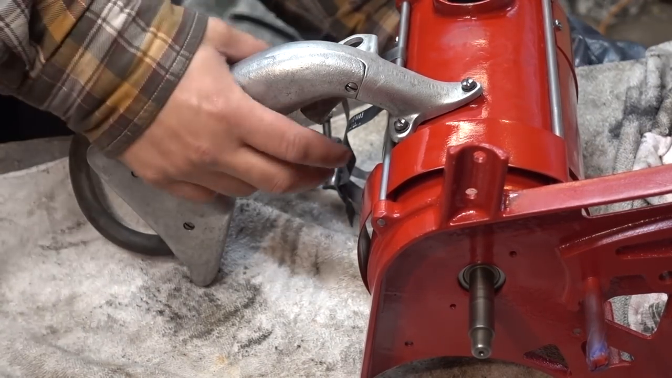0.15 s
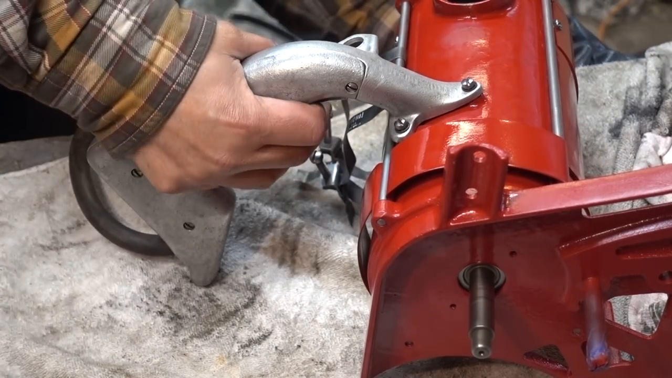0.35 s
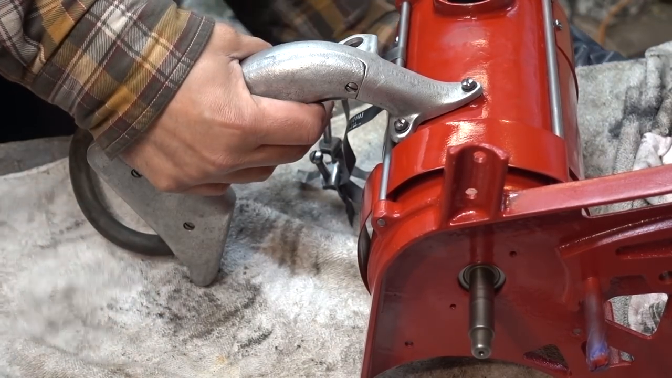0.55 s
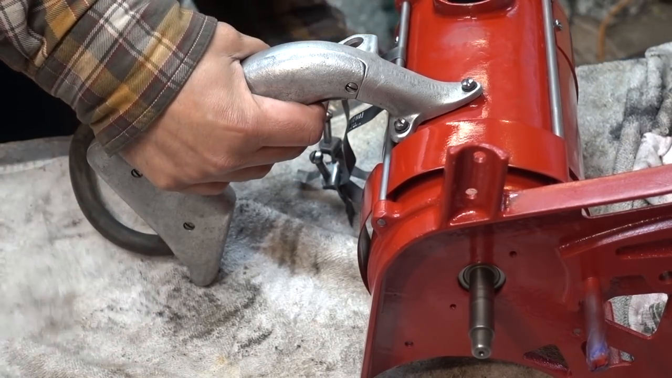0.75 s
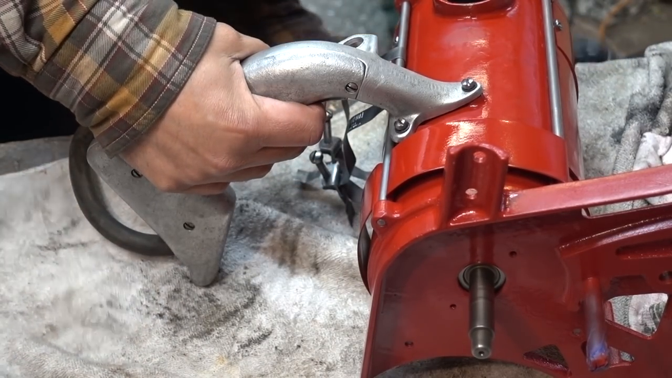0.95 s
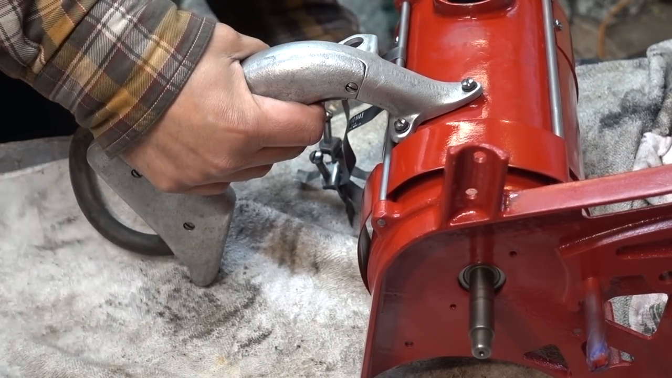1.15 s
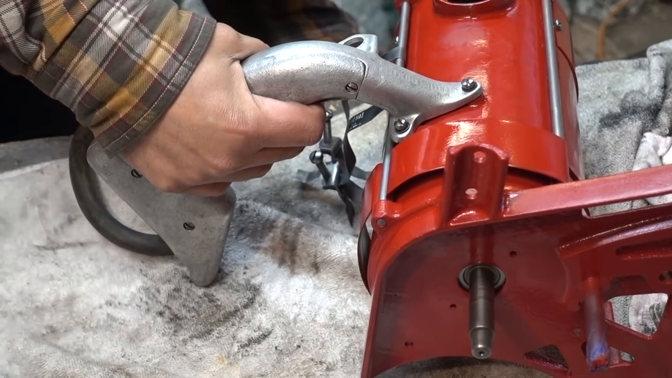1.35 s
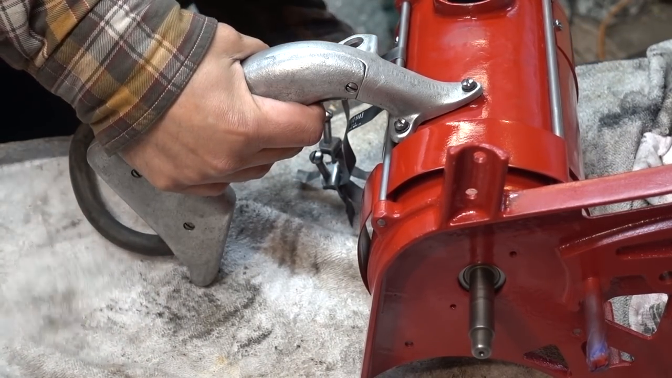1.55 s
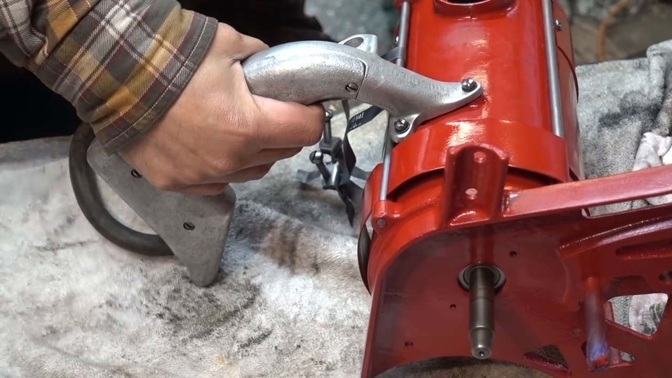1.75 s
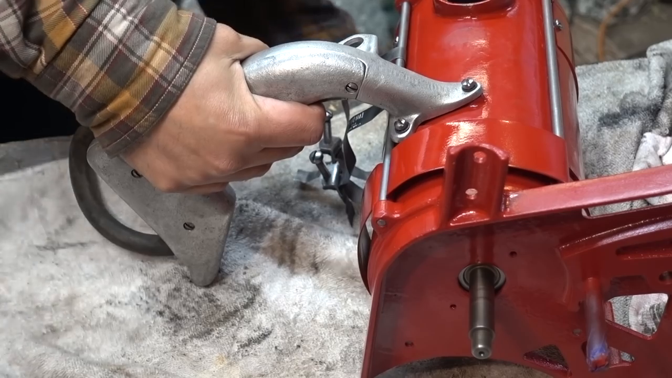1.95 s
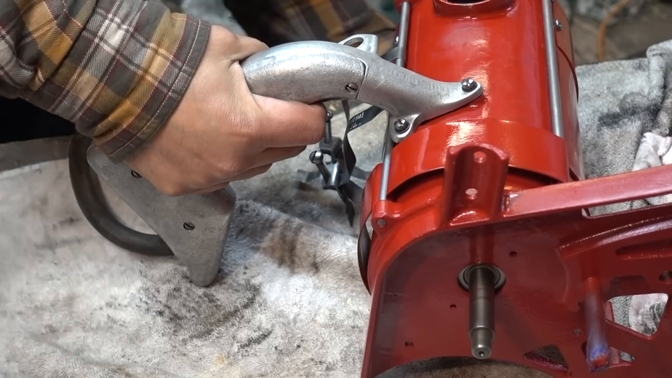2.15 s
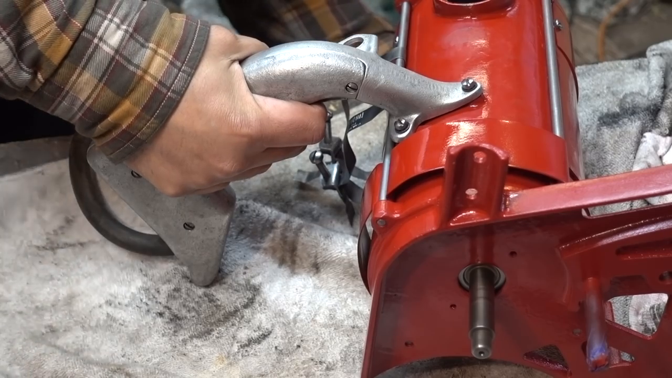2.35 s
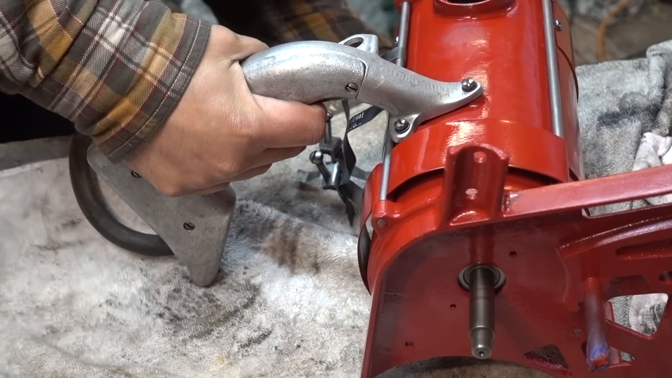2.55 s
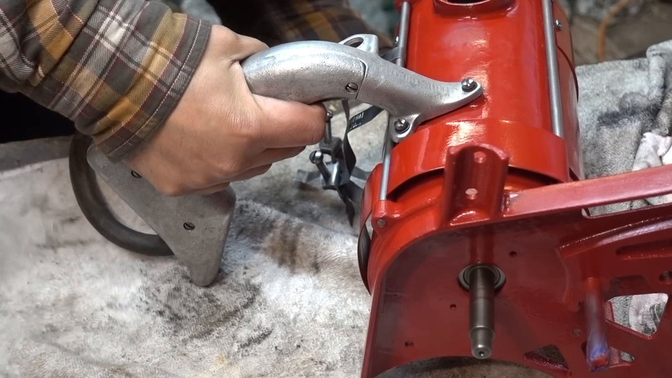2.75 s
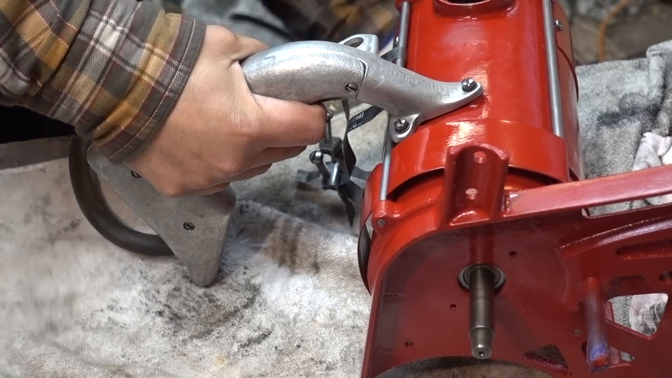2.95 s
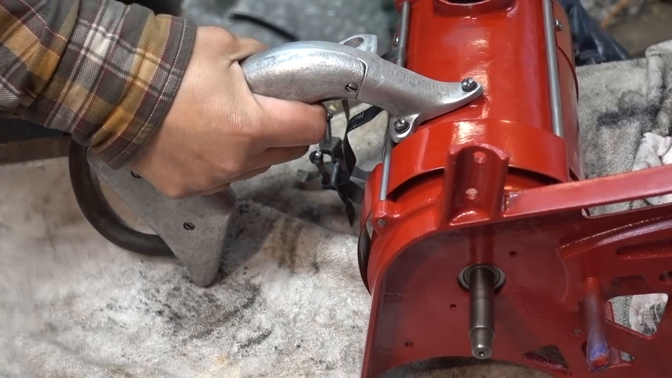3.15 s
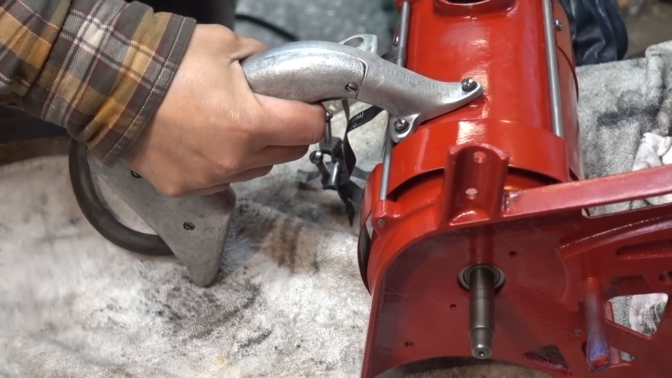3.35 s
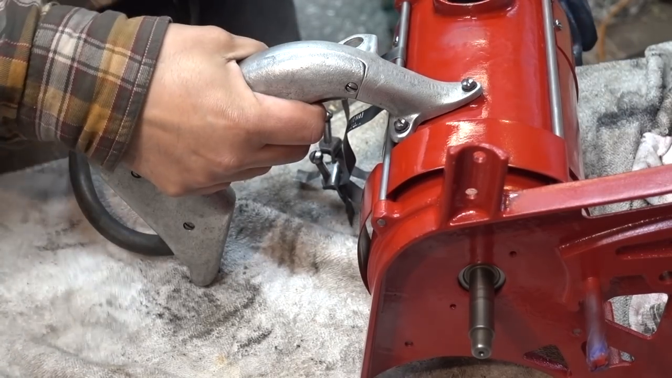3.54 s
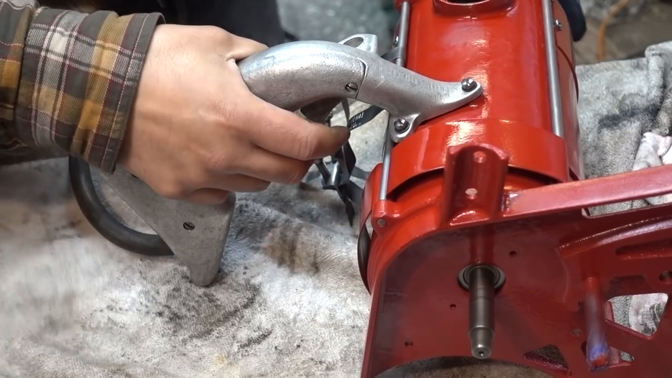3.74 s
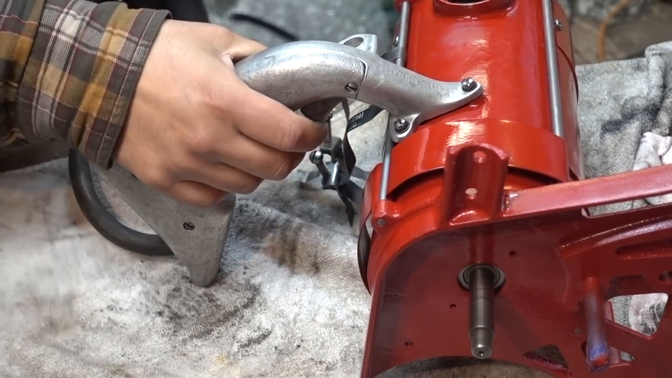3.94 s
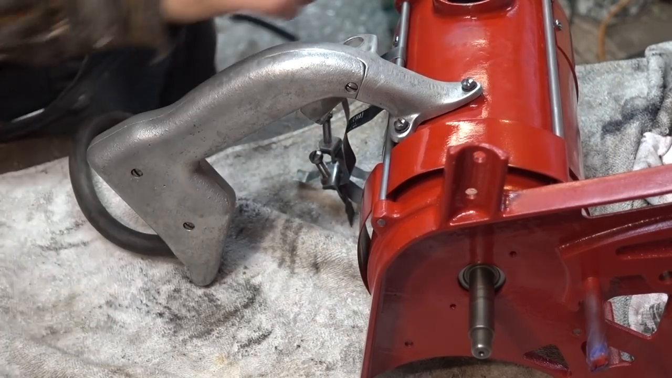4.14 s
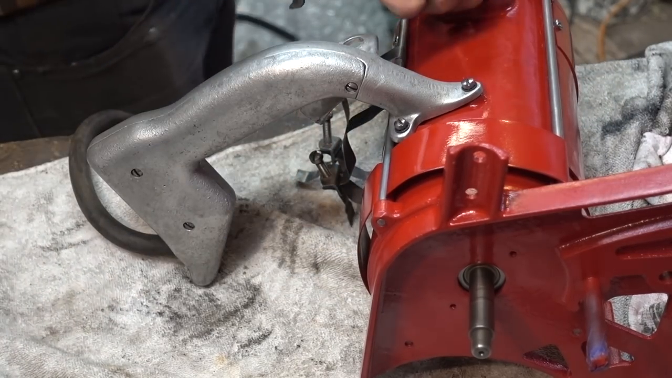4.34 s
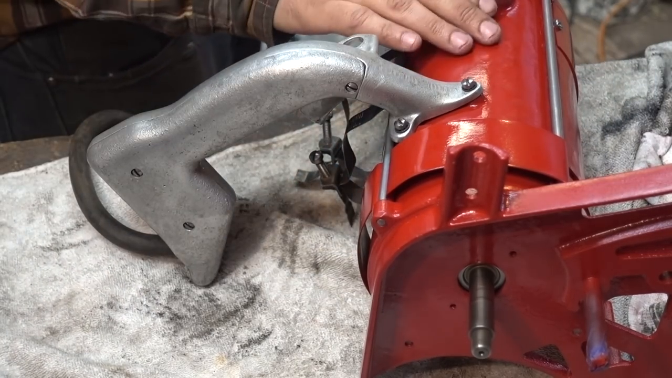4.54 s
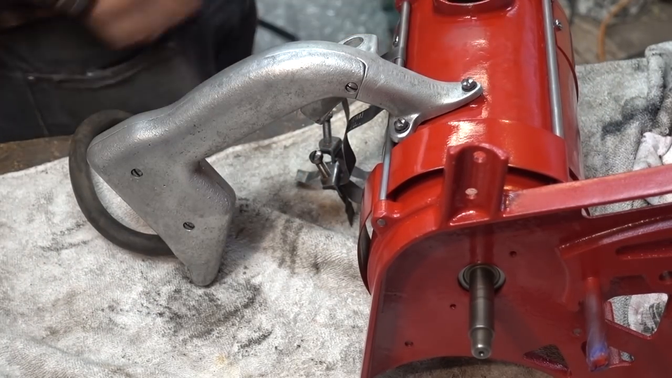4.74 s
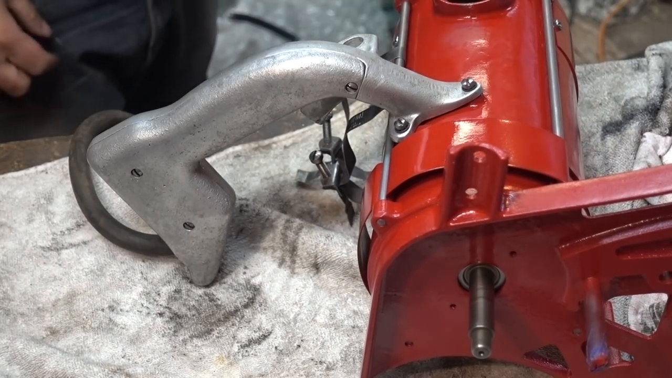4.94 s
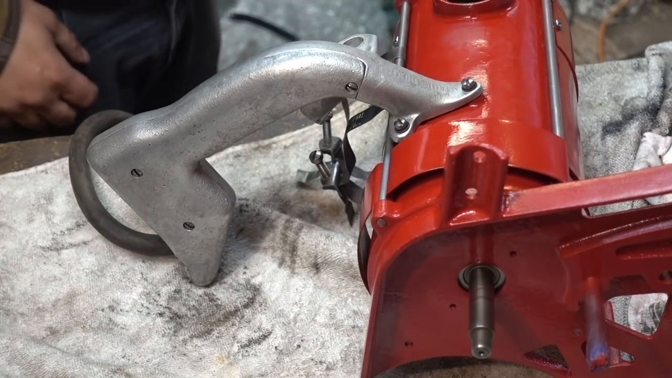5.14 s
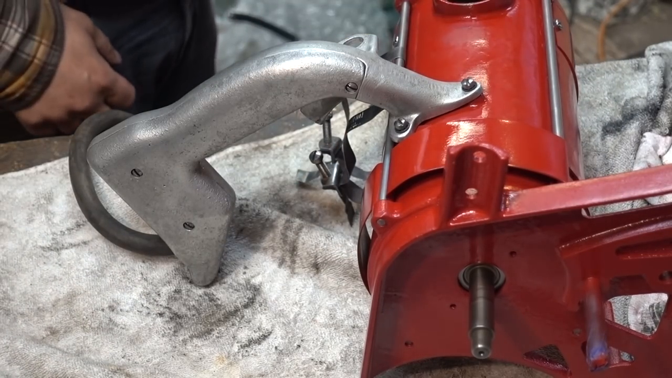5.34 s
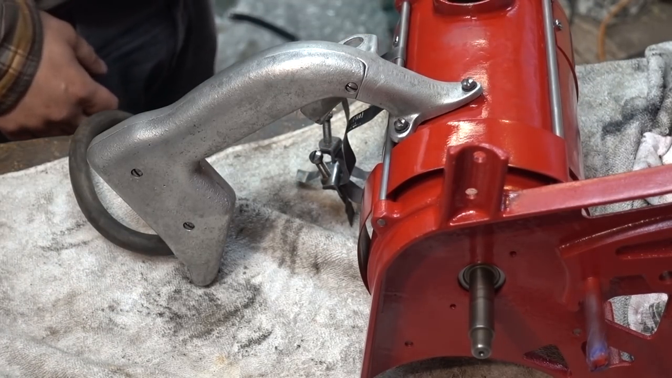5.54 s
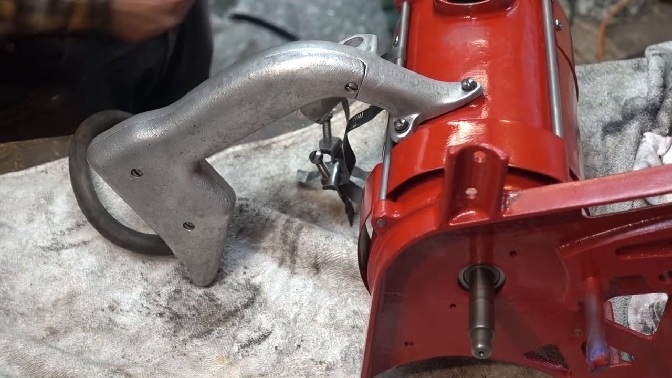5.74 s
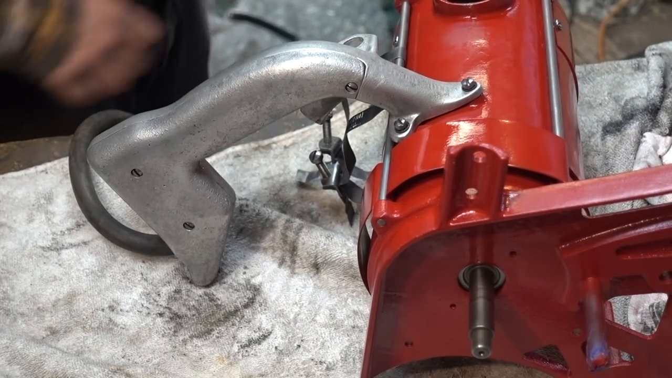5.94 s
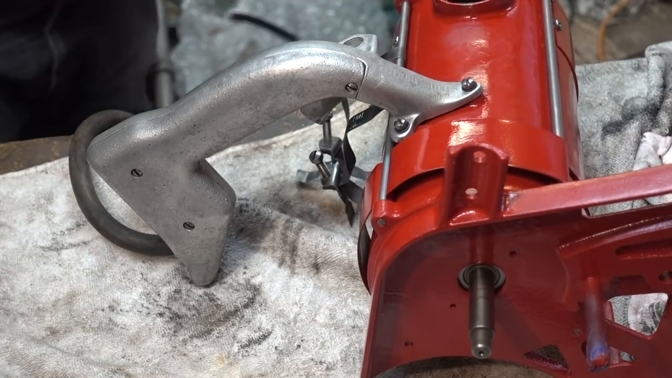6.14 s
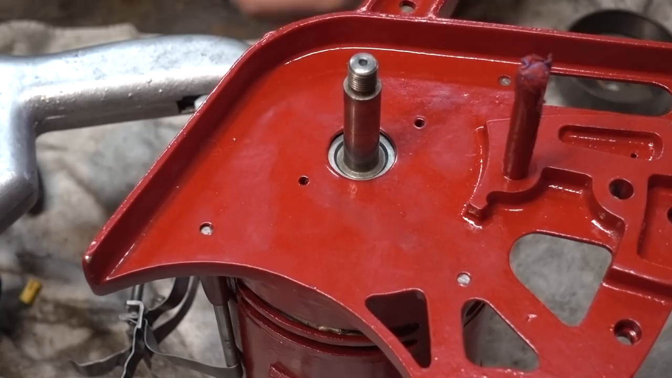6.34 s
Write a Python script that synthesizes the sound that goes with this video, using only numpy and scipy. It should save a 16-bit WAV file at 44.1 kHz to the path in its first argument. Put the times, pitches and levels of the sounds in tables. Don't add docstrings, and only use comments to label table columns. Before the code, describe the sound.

An electric motor without load, heard near on a bench. A descending whine turns quickly upward, wobbling through resonances, and settles into a bright whistle around two kilohertz with broad airy hiss. After about three seconds it runs down, the tone sliding lower and breaking into beads, airflow fading to grainy rubbing. A sudden change to near silence and a small steel part clinks. Thin bass, little room echo.

```python
import sys
import numpy as np
from scipy import signal
from scipy.io import wavfile
from scipy.ndimage import uniform_filter1d

SR = 44100
rng = np.random.default_rng(int(sys.argv[2]) if len(sys.argv) > 2 else 0)


def convert_level_to_amplitude(level_db):
    exponent = np.asarray(level_db, float) / 20
    return 10 ** exponent


def bounce(signal):
    frames = np.transpose(np.atleast_2d(signal))
    limited = np.clip(frames, -1, 1)
    pcm = np.round(limited * 32767).astype(np.int16)
    wavfile.write(sys.argv[1], SR, pcm)


N = 286209

ON_S, OFF_S = .415, 3.705
FULL_RPS = 208


def rms_one(x):
    return x / np.sqrt(np.mean(x ** 2) + 1e-20)


def in_time(rows):
    s, *columns = np.transpose(rows)
    return [np.interp(np.arange(N) / SR, s, c) for c in columns]


def at_hz(points, hz):
    points_hz, values = np.array(points).T
    return np.interp(np.log(hz), np.log(points_hz), values)


def by_speed(speed, column):
    # [speed/(turns/s), rub/dB, scars/dB, bench shake/dB, upper orders/dB]
    rows = np.array([(23.5, -67.5, -60, -83, -78), (33.2, -59.5, -62.5, -72.5, -73),
                     (66, -72, -60, -63, -88), (90, -90, -84, -63, -84), (137, -72.5, -70, -59.5, -69),
                     (174, -73.5, -63, -65, -80), (208, -57, -69.5, -82.5, -87)])
    return np.interp(np.log(speed), np.log(rows[:, 0]), rows[:, column])


def drift(rate_hz):
    r = np.exp(-80 * np.pi * rate_hz / SR)
    slow = signal.lfilter([1], [1, -2 * r, r * r], rng.standard_normal(N // 40 + 2002))[2000:]
    return np.interp(np.arange(N) / 40, np.arange(len(slow)), rms_one(slow))


def resonate(x, hz, width_hz):
    r = np.exp(-np.pi * width_hz / SR)
    zeros = np.array([1, 0, -1]) * (1 - r * r) / 2
    poles = [1, -2 * r * np.cos(2 * np.pi * hz / SR), r * r]
    return signal.lfilter(zeros, poles, x)


def banded(white, spectrum, change_db, patchy_db):
    likeness = [(60, 0.77), (150, 1), (380, 1), (950, 0.99), (2380, 0.82), (5980, 0.37), (15000, 0.43)]
    lean_db = [(100, -1.5), (1000, -0.3), (4000, -0.4), (12000, -0.5)]
    sign = np.array([[1], [-1]])
    edges_hz = 60 * 2 ** np.arange(0, 8.2, .4)
    out, together = 0, drift(9)
    for k, (low, high) in enumerate(zip(edges_hz, edges_hz[1:])):
        band = signal.butter(2, [low, high], "band", fs=SR, output="sos")
        mid, side = signal.sosfilt(band, white[k % 2])
        hz = np.sqrt(low * high)
        alike = np.clip(at_hz(likeness, hz), 0, 1)
        flicker_db = patchy_db * (0.24 * together + 0.45 * drift(38))
        gain = convert_level_to_amplitude(at_hz(spectrum, hz) + change_db(hz) + flicker_db)
        tilt = convert_level_to_amplitude(at_hz(lean_db, hz) / 2 * sign)
        out = out + gain * tilt * (np.sqrt(1 + alike) * mid + np.sqrt(1 - alike) * side * sign)
    return out


def room_ripple(hz, gliding, depth, grain_hz):
    land = rng.standard_normal((3, 1200)) + 1j * rng.standard_normal((3, 1200))
    at = [np.interp(hz[::16] / grain_hz, np.arange(1200), row) for row in land]
    echo = depth * gliding[::16]
    mixed = 1.17 * at[0] + 0.52 * np.array(at[1:])
    gain = np.abs(1 + echo * mixed) / np.sqrt(1 + echo ** 2)
    return gain.repeat(16, axis=1)[:, :N]


def shaft_speed():
    run_up = [(30.2, .151), (43.94, .3921)]
    start_rps, rest_rps, coast_s = 174.1, 63.15, .8747
    creep_rps_per_s = .6786
    friction_rps_per_s, drag_rps, drag_s = 27.28, 127.73, 1.248
    stick_s, stick_rps_per_s2 = 5.6, 3.2
    t = np.arange(N) / SR
    on = np.clip(t - ON_S, 0, OFF_S - ON_S)
    off = np.maximum(t - OFF_S, 0)
    first = rest_rps + (start_rps - rest_rps) * np.exp(-np.minimum(t, ON_S) / coast_s)
    gained = creep_rps_per_s * on + sum(rps * (1 - np.exp(-on / lag_s)) for rps, lag_s in run_up)
    friction = friction_rps_per_s * off + stick_rps_per_s2 * np.maximum(t - stick_s, 0) ** 2
    drag = drag_rps * (1 - np.exp(-off / drag_s))
    return first + gained - friction - drag


def fan_tone(turn, speed, gliding):
    # [t/s, left/dB, right/dB]
    blade = [(0, -45, -40.5), (.3, -49.5, -43.5), (.6, -41.5, -53), (.9, -44.5, -37.5), (1.05, -26, -29),
             (1.3, -25.5, -30.5), (1.62, -23.5, -34), (2.0, -28, -41.5), (2.57, -27.5, -37),
             (3.0, -30, -37), (3.3, -32.5, -35.5), (3.69, -35, -38), (3.73, -44.5, -40.5), (4.0, -40, -45),
             (4.8, -54.5, -56), (5.15, -60, -66), (5.62, -65, -66), (6.35, -100, -100)]
    # [t/s, left/dB, right/dB, width/ms]
    blade_swells = [(.002, -23.5, -32, 19), (.05, -30, -28.5, 5.1), (.162, -29, -31, 9.3),
                    (.181, -24, -20, 11), (.199, -26, -25, 9), (0.218, -23.5, -20, 11.6),
                    (0.254, -21, -25, 22), (.285, -26, -45, 6.8), (.309, -28, -35, 17),
                    (.459, -26.5, -34, 13), (.493, -22, -23.5, 19.6), (0.519, -25, -29.5, 11),
                    (.56, -44, -28.5, 37), (0.63, -32.5, -34, 21), (.653, -27, -34, 7.6),
                    (0.714, -24, -30, 27.4), (.922, -33, -47, 23), (3.993, -37, -47, 17),
                    (4.073, -34, -22.5, 6.1), (4.088, -38, -22, 12.5), (4.109, -41, -26.5, 13),
                    (4.2, -35, -34.5, 25), (4.245, -32.5, -28.5, 25), (4.276, -23.5, -24.5, 21.7),
                    (4.45, -39, -36.5, 24), (4.548, -34, -35.5, 28), (4.733, -43.5, -51, 28),
                    (4.893, -42, -41.5, 41), (5.285, -50, -53.5, 52), (5.48, -54.5, -51.5, 143)]
    # [shaft order, left/dB, right/dB at full speed, loss/dB per halving of speed]
    overtones = [(20, -59.5, -57.5, 12.5), (30, -62, -62.5, 17)]
    # [t/s, shaft order, left/dB, right/dB, width/ms]
    overtone_swells = [(.03, 30, -60, -50, 40), (.082, 20, -47, -51.5, 19), (4.27, 20, -60, -55.5, 51),
                       (.575, 20, -56, -50, 45), (.639, 20, -59, -35.5, 14), (.79, 30, -43.5, -42, 33),
                       (.83, 20, -52, -41.5, 74), (.92, 30, -50, -40.5, 58), (1.02, 30, -47, -57, 19),
                       (1.24, 30, -56.5, -52, 130), (1.42, 20, -42, -65, 44), (1.43, 30, -51.5, -52, 48),
                       (1.9, 30, -57.5, -58, 180), (2.0, 20, -53, -61, 140), (2.36, 20, -51, -44, 330),
                       (3.33, 20, -54, -49.5, 160), (3.6, 20, -56, -50.5, 260), (3.5, 30, -63, -59, 450),
                       (3.825, 30, -46.5, -44.5, 23), (3.873, 20, -50, -40, 23),
                       (3.883, 30, -40, -40.5, 11), (3.996, 20, -51, -41, 35), (4.085, 20, -43, -48, 28),
                       (4.55, 20, -57.5, -61, 100)]
    port_lags = [(10, 0.24), (20, 0.65), (30, 1)]
    glide_loss_db = 1

    t, out = np.arange(N) / SR, 0
    levels = [np.array(in_time(blade))]
    for _, left_db, right_db, loss_db in overtones:
        change_db = loss_db * np.log2(speed / FULL_RPS) - glide_loss_db * gliding
        levels.append(np.array([[left_db], [right_db]]) + change_db)
    swells = [(s, 10, left, right, ms) for s, left, right, ms in blade_swells] + list(overtone_swells)
    for (order, lag_rad), level_db in zip(port_lags, levels):
        ripple = room_ripple(order * speed, gliding, depth=3.6, grain_hz=13 * order / 10)
        power = (convert_level_to_amplitude(level_db + 0.67 * drift(32)) * ripple) ** 2
        for s, k, left_db, right_db, width_ms in swells:
            if round(k) == round(order):
                near = slice(max(0, int((s - width_ms / 500) * SR)), int((s + width_ms / 500) * SR))
                bump = np.exp(-((t[near] - s) / (width_ms * 0.00057)) ** 2)
                power[:, near] += convert_level_to_amplitude([[left_db], [right_db]]) ** 2 * bump
        out = out + np.sqrt(2 * power) * np.sin(order * turn - np.array([[0], [lag_rad]]))
    return out


def rotor_tones(turn, speed, gliding):
    slot_tone = [(380, -65), (430, -86), (760, -80), (880, -62), (1020, -70), (1250, -56), (1370, -49),
                 (1480, -68)]
    bar_tone = [(1100, -86), (1300, -65), (1580, -58), (1730, -61), (1840, -77), (2650, -75), (2850, -64),
                (3100, -76)]
    unbalance_tone = [(90, -98), (135, -80.5), (165, -68.5), (185, -82.5), (200, -71.5), (208, -70)]
    # [shaft order, level/dB at full speed, loss/dB per halving of speed]
    weak_orders = [(40, -71, 12.0)]
    surge_db, surge_s = 16, 0.09
    third_slot_db = 9

    upper_db = by_speed(speed, column=4)

    def muffled(k):
        octaves_off = np.abs(np.log2(k * speed / 3500))
        return upper_db - 14 * np.maximum(0, octaves_off - .5)

    levels = [(k, muffled(k)) for k in (36, 39, 45, 54, 64, 80)]
    levels.append((48, muffled(48) + third_slot_db))
    levels += [(k, db + loss * np.log2(speed / FULL_RPS)) for k, db, loss in weak_orders]
    tones = 0
    for k, db in levels:
        ripple = room_ripple(k * speed, gliding, depth=2.5, grain_hz=90)[0]
        tones = tones + convert_level_to_amplitude(db) * ripple * np.sin(k * turn + k)

    since_surge_s = np.arange(N) / SR - ON_S - surge_s / 2
    slot_db = at_hz(slot_tone, 16 * speed) + surge_db * np.exp(-(since_surge_s / surge_s) ** 2)
    bar_db = at_hz(bar_tone, 32 * speed)
    for k, db in (16, slot_db), (32, bar_db):
        ripple = room_ripple(k * speed, gliding, depth=.35, grain_hz=45)[0]
        tones = tones + convert_level_to_amplitude(db) * ripple * np.sin(k * turn + k)
    unbalance = convert_level_to_amplitude(at_hz(unbalance_tone, speed)) * np.sin(turn)
    return np.sqrt(2) * (tones + unbalance)


def airflow(turn, speed):
    air_colour = [(60, -40), (150, -47.5), (300, -29), (560, -27.5), (1100, -18.5), (1900, -20.5),
                  (2500, -26.5), (3100, -30), (4800, -27.5), (7000, -35), (10000, -46), (12500, -45.5),
                  (15600, -70)]
    housing = [(568, 103, 8), (1077, 20, 3), (1017, 41, 4), (1294, 34, 5.5), (1735, 73, 5),
               (4790, 1600, -4), (10180, 490, 6.5), (2304, 220, 2.5)]
    gust = [(0, 4), (.09, 2.5), (.18, 1), (.45, 0.5), (.54, 3.5), (.63, 1.5), (.72, 2), (.81, 5.5),
            (.99, 5), (1.17, 1), (2.0, 1.5), (3.4, -1), (3.8, 1), (4.09, 2), (4.22, 0.5), (4.48, 0),
            (5.5, 0.5), (6.35, 0)]
    # [f/Hz, level/dB at full speed, gust share, halvings of speed before fading, loss/dB per further halving]
    air_law = [(524, -0.5, 0.94, 1.18, 11.5), (1730, 0.8, 0.9, 0.57, 12), (4800, 2.5, 1.08, 0.068, 5),
               (11000, -2, 1.2, 0.14, 1.5)]
    air_db = -43

    gust_db, = in_time(gust)
    halvings = np.log2(FULL_RPS / speed)
    log_bands = np.log(np.array(air_law)[:, 0])
    changes_db = np.array([db + share * gust_db - loss * np.maximum(0, halvings - knee)
                           for _, db, share, knee, loss in air_law])

    def change_db(hz):
        top = 1 + 2.0 * max(0, np.log2(hz / 9500))
        weights = np.array([np.interp(np.log(hz), log_bands, one) for one in np.eye(4)])
        return top * weights @ changes_db

    grain_db = 0.67 * rng.standard_normal(N // 64 + 1).repeat(64)[:N]
    white = rng.standard_normal((2, 2, N)) * convert_level_to_amplitude(0.69 * np.sin(turn) + grain_db)
    air = banded(white, air_colour, change_db, patchy_db=2.07)
    air = air + sum((convert_level_to_amplitude(db) - 1) * resonate(air, hz, width) for hz, width, db in housing)
    return convert_level_to_amplitude(air_db) * air / np.sqrt(np.mean(air[:, 2 * SR:3 * SR] ** 2))


def shaft_rub(speed):
    rub_modes = [(1450, 300, -3), (1800, 250, -4), (2150, 110, 2), (2600, 250, -4), (4030, 120, -7),
                 (5300, 1000, -11), (9850, 100, -11), (12300, 120, -24)]
    struck = rng.random((2, N)) < 2500 / SR
    size = convert_level_to_amplitude(1.7 * np.minimum(rng.exponential(1, (2, N)), 5))
    clicks = struck * size * rng.choice([-1, 1], (2, N))
    clicks = clicks[0] + 0.12 * clicks[1] * [[1], [-1]]
    rings = sum(convert_level_to_amplitude(db + 1.5 * drift(20)) * resonate(clicks, hz, width) for hz, width, db in rub_modes)
    return convert_level_to_amplitude(by_speed(speed, column=1)) * rms_one(rings)


def commutator(turn, speed):
    scar_modes = [(1590, 330, 3.5), (2125, 94, 7), (2444, 160, -1), (3270, 290, -7.5), (4010, 280, -2),
                  (5200, 1300, 1.5)]
    profile = rng.standard_normal(320) * convert_level_to_amplitude(4.4 * rng.standard_normal(320))
    bumps = np.interp(turn / (2 * np.pi) % 1 * 320, np.arange(320), profile, period=320)
    rings = 0
    for hz, width_hz, db in scar_modes:
        ring = resonate(resonate(bumps, hz, width_hz), hz, width_hz)
        rings = rings + convert_level_to_amplitude(db + 2.5 * drift(6)) * ring
    return convert_level_to_amplitude(by_speed(speed, column=2)) * rms_one(rings)


def bench(turn, speed):
    bench_modes = [(175, 25, -9), (280, 22, -1), (375, 25, 0)]   # [f/Hz, width/Hz, level/dB]
    orders = sum(convert_level_to_amplitude(3 * rng.normal()) * np.sin(k * turn + k * k) for k in range(2, 15))
    rings = sum(convert_level_to_amplitude(db) * resonate(resonate(orders, hz, width), hz, width) for hz, width, db in bench_modes)
    return convert_level_to_amplitude(by_speed(speed, column=3)) * rings


def clink():
    # [t/s, level/dB, die-away/ms]
    clinks = [
        (6.407, -64, 5.2),
        (6.417, -65, 7.7),
        (6.425, -49.5, 5.7),
        (6.440, -83, 4),
        (6.447, -79, 5.8),
        (6.462, -75, 6.7),
    ]
    clink_modes = [(11200, 350, -13), (14100, 470, -19), (15000, 370, -25), (2310, 490, -14.5),
                   (3060, 550, -19.5), (5900, 480, -23), (7870, 500, -27.5)]
    sing_hz = 11020
    n = SR // 4
    ms = np.arange(N - n, N) / SR * 1000
    white = rng.standard_normal(n)
    strokes = 0
    for s, db, die_ms in clinks:
        after_ms = ms - 1000 * s
        slope_ms = np.where(after_ms < 0, 0.42 * die_ms, die_ms)
        strokes = strokes + convert_level_to_amplitude(db) * np.exp(-(after_ms / slope_ms) ** 2)
    modes = np.sqrt(2 * strokes / strokes.max()) * np.sin(2 * np.pi * sing_hz * ms / 1000)
    for hz, width_hz, db in clink_modes:
        modes = modes + convert_level_to_amplitude(db) * rms_one(resonate(resonate(white, hz, width_hz), hz, width_hz))
    return np.pad(strokes * modes, (N - n, 0)) * convert_level_to_amplitude([[0.5], [-0.5]])


def shop_rumble():
    white = rng.standard_normal((2, N))
    low = signal.butter(2, 272, fs=SR, output="sos")
    return convert_level_to_amplitude(-77) * rms_one(signal.sosfilt(low, white[0] + .1 * white))


def quiet_shop():
    quiet = [(6.36, -100), (6.39, -88), (6.41, -83), (6.49, -80)]   # [t/s, level/dB]
    quiet_colour = [(100, -21.5), (370, -6.5), (730, -3), (2500, -2), (5000, -11), (10000, -19.5),
                    (15500, -30.5)]
    white = rng.standard_normal((2, 2, N))
    noise = banded(white, quiet_colour, lambda hz: 0, patchy_db=1.0)
    return convert_level_to_amplitude(in_time(quiet)[0]) * rms_one(noise)


def scene():
    change_s, fade_s = 6.3595, .005
    speed = shaft_speed()
    turn = 2 * np.pi * np.cumsum(speed) / SR
    rps_per_s = uniform_filter1d(np.abs(np.gradient(speed)) * SR, size=2000)
    gliding = np.clip(rps_per_s / 20 - 1.4, 0, 1)
    motor = fan_tone(turn, speed, gliding) + rotor_tones(turn, speed, gliding)
    motor = motor + airflow(turn, speed) + shaft_rub(speed)
    motor = motor + commutator(turn, speed) + bench(turn, speed) + shop_rumble()
    motor_on = np.clip((change_s - np.arange(N) / SR) / fade_s, 0, 1)
    return motor * motor_on + clink() + quiet_shop()


def band_limit(x):
    return signal.sosfilt(signal.butter(12, 15610, fs=SR, output="sos"), x)


def record(dry):
    dry = dry * np.minimum(1, np.arange(N) / 60)
    ports = signal.butter(4, 153, "high", fs=SR, output="sos")
    thin = signal.sosfilt(ports, dry)
    return band_limit(thin)


dry = scene()
out = record(dry)
bounce(out)
```